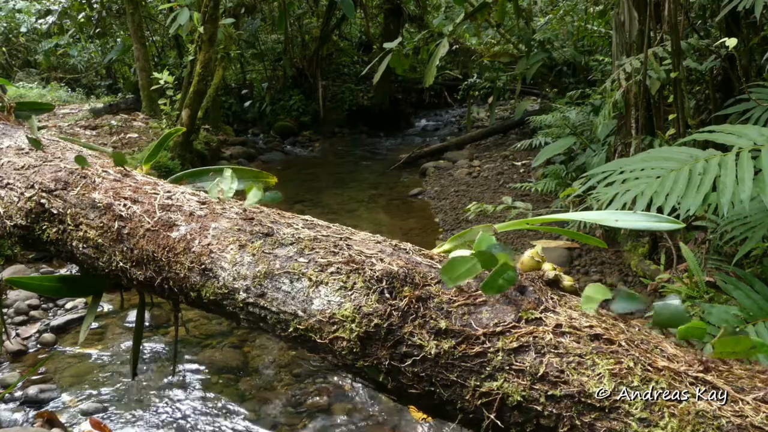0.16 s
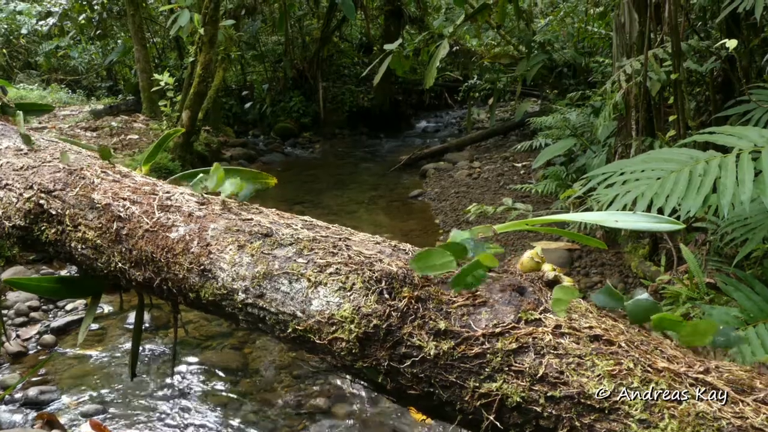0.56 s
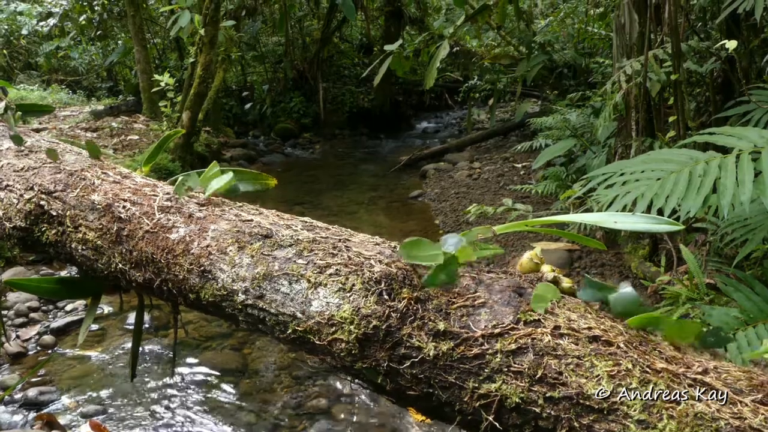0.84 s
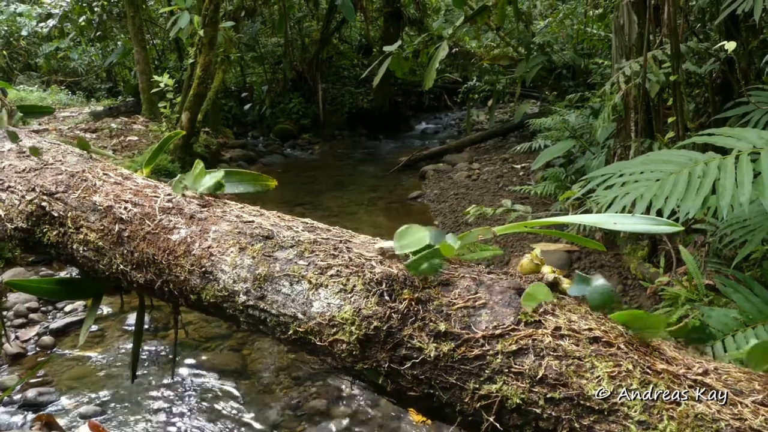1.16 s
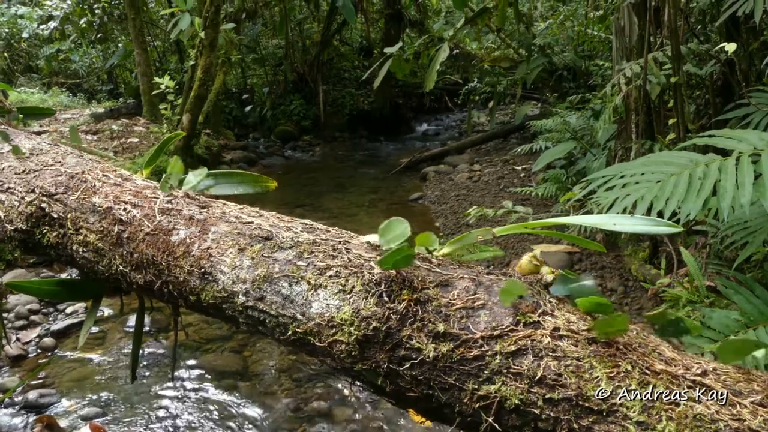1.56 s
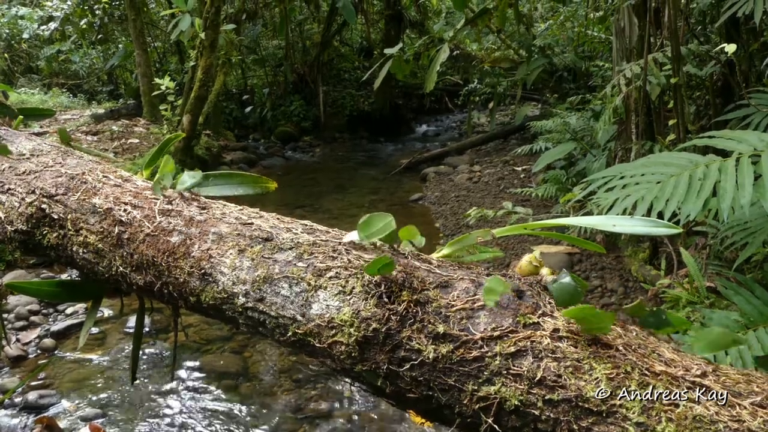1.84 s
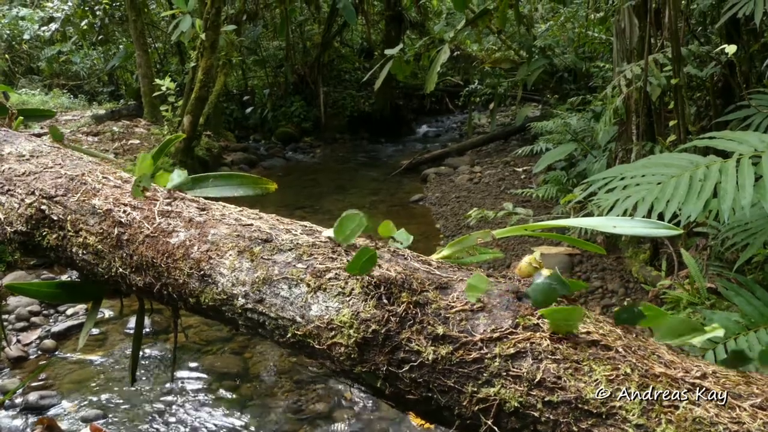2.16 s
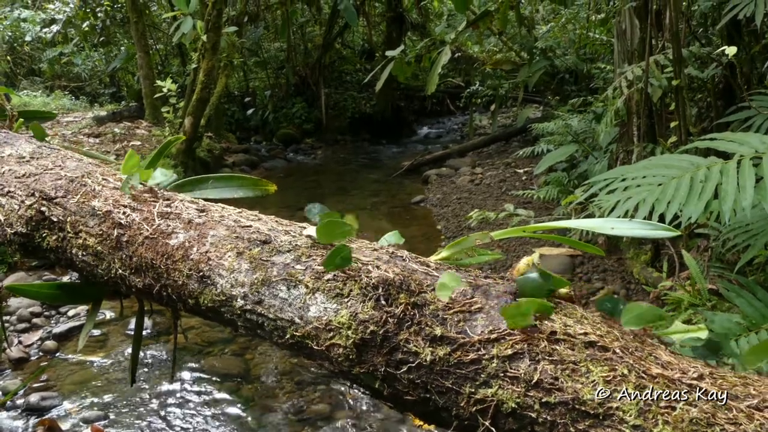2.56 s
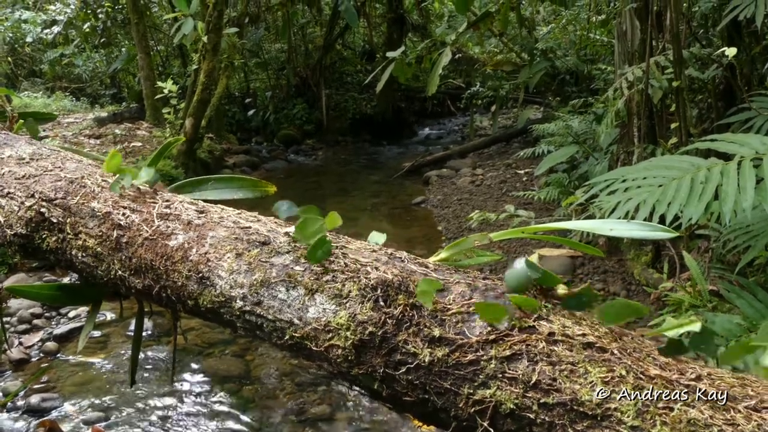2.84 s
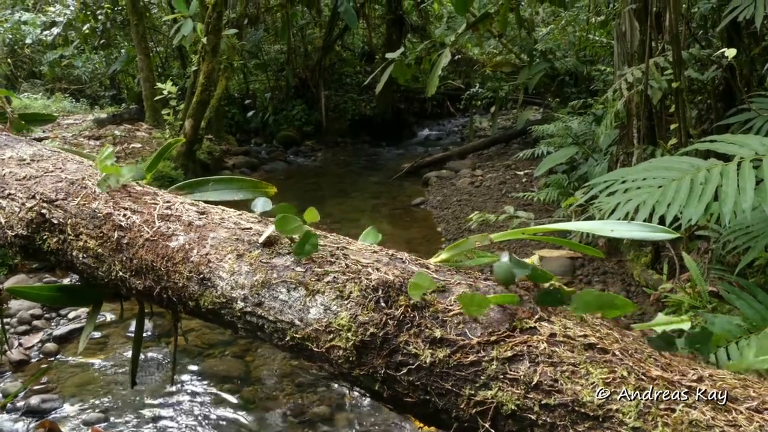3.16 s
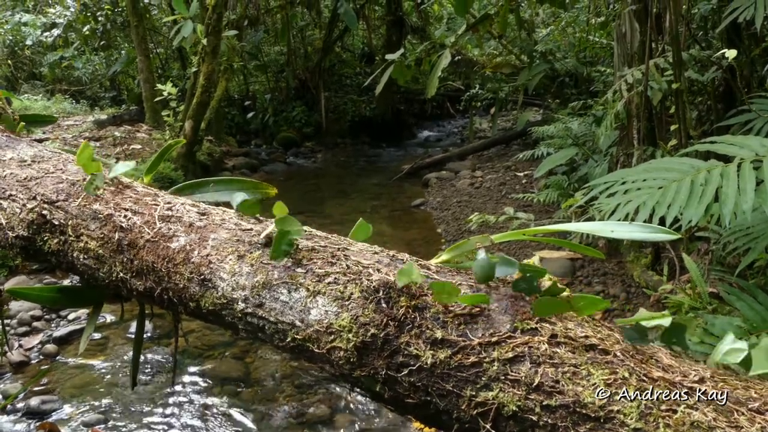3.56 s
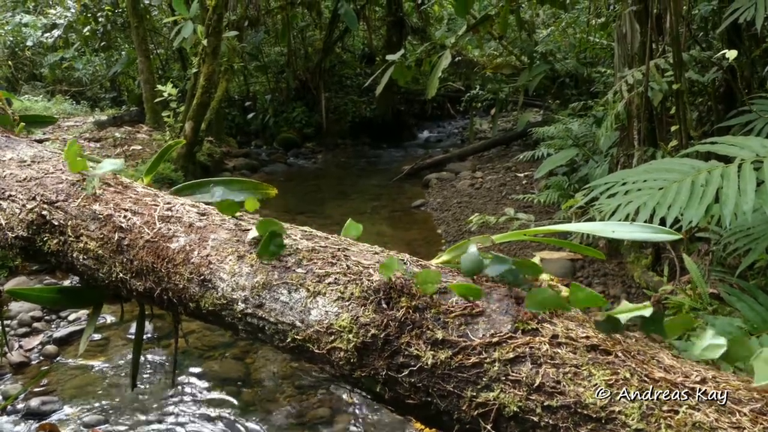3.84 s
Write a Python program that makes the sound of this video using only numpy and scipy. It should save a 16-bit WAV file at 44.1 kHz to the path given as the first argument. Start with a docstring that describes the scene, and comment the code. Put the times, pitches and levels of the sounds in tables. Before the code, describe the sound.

A shallow forest stream fades in, rushing and bubbling over stones a few metres away, with small gulps, plinks and splashes. A nearby insect chirps in high, even pulses over a thin buzz of distant insects.

```python
"""After 0.2 s of silence a shallow forest stream fades in, rushing over stones a few metres away:
a wash of water, a swarm of short-lived ringing bubbles and fine spray, with a thin, steady buzz
of far insects. From 0.4 s a nearer insect rasps its wings near 7.4 kHz, about 2.5 chirps a second.
The fade ends at 0.9 s. Larger gulps, plinks and splashes stand out from the water, thickest
around 3.1 s; stream and insects carry on to the end at 4 s."""
import sys
import numpy as np
from scipy import signal
from scipy.fft import rfft, irfft
from scipy.io import wavfile
from scipy.ndimage import uniform_filter1d

SR = 44100
rng = np.random.default_rng(int(sys.argv[2]) if len(sys.argv) > 2 else 0)


def generate_wav(signal):
    """Clip the signal to [-1, 1] and save it as 16-bit WAV at the path in sys.argv[1]."""
    frames = np.transpose(np.atleast_2d(signal))
    scaled = np.clip(frames, -1, 1) * 32767
    pcm = np.round(scaled).astype(np.int16)
    wavfile.write(sys.argv[1], SR, pcm)


N = 176400
T = np.arange(N) / SR

# Flow strength. Each row: time in seconds, gain in dB.
FLOW_CURVE = [(.2, 0.5), (.6, 0.5), (.9, -0.5), (1.25, 1), (1.56, 0.4), (1.66, 0.5), (1.85, 0.8),
              (2.3, 0.7), (2.7, 0), (2.92, 2), (3.12, 0), (3.36, 2), (3.46, -1), (3.75, 1.15), (4, -0.5)]
# Wash spectrum. Each row: frequency in Hz, relative density in dB.
WASH_SPECTRUM = [(25, -43), (60, -27.5), (150, -10), (260, -9.5), (420, -2.5), (1000, -1), (1500, -5),
                 (3000, -7), (5000, -15), (6500, -13), (8000, -16.5), (10000, -13), (13000, -18),
                 (15500, -23)]
# Wash stereo image. Each row: frequency in Hz, left-right correlation (clipped to -1..1 in use).
WASH_CORRELATION = [(60, -1.03), (110, -0.61), (170, -0.89), (270, 0.5), (450, 1), (1200, 0.84),
                    (3000, 0.67), (6000, 0.69), (9000, 0.63), (12000, 0.091), (15000, 0.18)]
# Water balance. Each row: frequency in Hz, left minus right in dB.
WATER_BALANCE = [(100, 0.5), (400, -1), (1200, 2.5), (3300, .5), (7000, 0), (10000, 0.9), (15000, 3.5)]
# Bubble size classes. Each row: pitch in Hz, bubbles per second, class level in dB.
BUBBLE_CLASSES = [(202, 20, -67.5), (303, 40, -52), (395, 60, -44.5), (672, 60, -44.5), (1014, 70, -45.5),
                  (1430, 80, -47.5), (3220, 110, -50), (5950, 130, -53.5)]
# Loud single bubbles. Each row: start in seconds, pitch in Hz, relative peak in dB.
GULP_EVENTS = [(.696, 237, -33), (.984, 860, -23), (1.134, 8030, -37), (1.301, 490, -22),
               (1.332, 2570, -31), (1.529, 575, -22), (1.55, 275, -27.5), (1.567, 382, -24.5),
               (1.732, 3340, -27), (1.802, 693, -24.5), (1.854, 1180, -21), (1.861, 2060, -26),
               (1.885, 4060, -24), (1.96, 1064, -21), (1.969, 3360, -25), (2.19, 563, -23.5),
               (2.26, 980, -20.5), (2.367, 760, -26), (2.389, 1420, -25), (2.485, 5020, -29),
               (2.53, 270, -31.5), (2.719, 3590, -29.5), (2.874, 1150, -24.5), (2.933, 1150, -25),
               (3.023, 291, -26), (3.049, 610, -18.5), (3.068, 5740, -27), (3.085, 2700, -27),
               (3.087, 2200, -24), (3.12, 696, -25), (3.134, 417, -20.5), (3.184, 456, -27.5),
               (3.242, 900, -22.5), (3.243, 3070, -26.5), (3.261, 1600, -25), (3.282, 1940, -26),
               (3.321, 453, -26), (3.462, 6100, -27.5), (3.69, 5700, -33), (3.819, 11220, -33)]
# Splashes. Each row: crest time, rise and fall in seconds, centre and width in Hz, level in dB.
SPLASH_EVENTS = [(0.89, 0.013, 0.014, 900, 190, -31.5), (1.07, 0.022, .03, 1980, 500, -33.5),
                 (1.19, .25, .25, 10600, 1900, -44.5), (2.28, .08, .08, 10000, 1800, -46),
                 (2.93, 0.066, 0.057, 970, 230, -32.5), (3.105, 0.026, 0.018, 880, 190, -29),
                 (3.464, .002, 0.06, 5400, 700, -37), (3.62, .02, .025, 10500, 1800, -44),
                 (3.82, .003, .02, 11000, 1500, -41)]
# Insect chirps. Each row: start in seconds, length in seconds, gain in dB.
CHIRP_EVENTS = [(.42, .155, -.5), (.82, .15, -1.5), (1.24, .155, 0), (1.635, .155, 0), (2.015, .15, .5),
                (2.415, .17, -.5), (2.825, .135, -1), (3.185, .16, 0), (3.568, .15, -.5), (3.955, .15, 0)]
# Fade-in. Each row: time in seconds, gain in dB.
FADE_CURVE = [(.2, -27.5), (.3, -18.5), (.41, -8), (.6, -5.5), (.9, -2)]

WASH_DB, PATCH_DB, FLICKER_DB = -31, 3, 0.56
TREBLE_FOLLOWS, TREBLE_HZ = 0.41, 1800  # hiss follows the flow less than the low end
BUBBLE_CYCLES, BUBBLE_SPREAD_DB, BUBBLE_PAN = 2.37, 2.5, 0.39
BUBBLE_HIGHPASS_HZ = 177  # bubbles, spray and splashes stay clear of the deep bass
GULP_CYCLES, GULP_REF_HZ = 3.14, 596
SPRAY_DB, SPRAY_PER_S, SPRAY_SPREAD_DB, SPRAY_DECAY_S = -48.5, 650, 7.5, 0.0006
SWARM_WET_DB, GULP_WET_DB, BANK_T60_S = -5, -9, 0.11  # the nearest bubbles are the driest
WING_HZ, WING_WAVER_HZ, WING_RASP = 7438, 13.6, 0.37
STROKES_PER_S, STROKE_DECAY_S, STROKE_FLAT_HZ, STROKE_JITTER_CYCLES = 106, 0.0058, 20, 0.053
CHIRP_DB, CHIRP_ATTACK_S, CHIRP_RELEASE_S = -37, 0.0015, 0.0099
INSECT_WET_DB, INSECT_T60_S = -19, 0.18
CHORUS_DB, CHORUS_HZ, CHORUS_WIDTH_HZ, CHORUS_PULSE_HZ = -40.5, 7215, 180, 51.7
SILENCE_S, LOWPASS_HZ = 0.2, 15600


def wash(size=1024, hop=256):
    """The blended rush of the whole stream, churning in patches."""
    frames, hz = N // hop + 5, np.fft.rfftfreq(size, 1 / SR)
    left_re, left_im, other_re, other_im, patches = rng.standard_normal((5, frames, len(hz)))
    patches = unit(uniform_filter1d(uniform_filter1d(patches, size=9, axis=0), size=9, axis=1))
    flicker = unit(uniform_filter1d(rng.standard_normal(frames), size=7))[:, None]
    follows = TREBLE_FOLLOWS + (1 - TREBLE_FOLLOWS) / (1 + (hz / TREBLE_HZ) ** 2)
    flow_db = np.interp(np.arange(frames) * hop / SR, *np.transpose(FLOW_CURVE))[:, None]
    level_db = lookup(WASH_SPECTRUM, hz) + follows * (flow_db + PATCH_DB * patches) + FLICKER_DB * flicker
    correlation = np.clip(lookup(WASH_CORRELATION, hz), -1, 1)
    left = left_re + 1j * left_im
    right = correlation * left + np.sqrt(1 - correlation ** 2) * (other_re + 1j * other_im)
    spectra = np.array([left, right]) * amp(level_db)
    _, rush = signal.istft(spectra.swapaxes(1, 2), nperseg=size, noverlap=size - hop)
    return amp(WASH_DB) * unit(rush[:, :N])


def bubble(hz, cycles, rise=0.043):
    """An air pocket rings, `cycles` per decay time, its pitch rising as it surfaces."""
    age = np.arange(0, 6, hz / cycles / SR)  # in decay times
    envelope = (1 - np.exp(-age / 0.74)) * np.exp(-age)
    return envelope * np.sin(2 * np.pi * cycles * (age + rise * age ** 2 / 2))


def gurgle(classes=40):
    """One bubble swarm per size class, swelling with the flow."""
    out = np.zeros((2, N))
    for hz in np.geomspace(BUBBLE_CLASSES[0][0], BUBBLE_CLASSES[-1][0], classes):
        ring = bubble(hz, BUBBLE_CYCLES * rng.uniform(0.57, 1.24))
        births = impulses(lookup(BUBBLE_CLASSES, hz), BUBBLE_SPREAD_DB, BUBBLE_PAN)
        swarm = signal.oaconvolve(births, ring[None], axes=1)[:, :N]
        out += amp(lookup(BUBBLE_CLASSES, hz, column=2)) * unit(swarm)
    return out * amp(np.interp(T, *np.transpose(FLOW_CURVE)))


def gulps():
    """Near single bubbles, deep gulps to plinks; smaller ones ring for more cycles."""
    out = np.zeros(N)
    for start_s, hz, db in GULP_EVENTS:
        ring = bubble(hz, GULP_CYCLES * (hz / GULP_REF_HZ) ** 0.23)
        add(out, start_s, amp(db) * ring / ring.max())
    return out


def splashes():
    """Water breaks over a stone: a bubble cloud swells and dies away."""
    out = np.zeros((2, N))
    for crest_s, rise_s, fall_s, hz, width_hz, db in SPLASH_EVENTS:
        mid, side = noise_band(hz, width_hz), 0.43 * noise_band(hz, width_hz)
        swell = np.exp(-((T - crest_s) / np.where(T < crest_s, rise_s, fall_s)) ** 2)
        out += amp(db) * swell * np.array([mid + side, mid - side])
    return out


def spray(shapes=8, size=256, band_hz=(2960, 10000)):
    """Droplets tick on the surface."""
    out = np.zeros((2, N))
    for _ in range(shapes):
        tick = rng.standard_normal(size) * np.exp(-T[:size] / SPRAY_DECAY_S)
        drops = impulses(SPRAY_PER_S / shapes, SPRAY_SPREAD_DB, pan=0.98)
        out += signal.oaconvolve(drops, tick[None], axes=1)[:, :N]
    bandpass = signal.butter(1, band_hz, "band", fs=SR, output="sos")
    return amp(SPRAY_DB) * unit(signal.sosfilt(bandpass, out))


def insect():
    """Chirps of uneven wing strokes; each stroke rings the wing, slightly flat and raspy."""
    out = np.zeros(N)
    for start_s, length_s, db in CHIRP_EVENTS:
        t = T[T < length_s + CHIRP_RELEASE_S / 2]
        turns = t * STROKES_PER_S
        stroke, age_s = turns.astype(int), turns % 1 / STROKES_PER_S
        slip, force = rng.standard_normal((2, 64))
        pitch_hz = WING_HZ + WING_WAVER_HZ * noise_band(0, width_hz=7.7)[:len(t)]
        cycles = np.cumsum(pitch_hz) / SR - STROKE_FLAT_HZ * age_s + STROKE_JITTER_CYCLES * slip[stroke]
        tone = np.sqrt(2) * np.sin(2 * np.pi * cycles)
        rasp = WING_RASP * noise_band(WING_HZ - STROKE_FLAT_HZ, width_hz=130)[:len(t)]
        pulses = (1 - np.exp(-age_s / STROKE_DECAY_S / 0.37)) * np.exp(-age_s / STROKE_DECAY_S)
        chirp = unit(pulses * amp(2 * force[stroke]) * (tone + rasp))
        edges = np.minimum(np.minimum(t / CHIRP_ATTACK_S, (t[-1] - t) / CHIRP_RELEASE_S), 1)
        add(out, start_s, amp(CHIRP_DB + db) * edges * chirp)
    return out + amp(INSECT_WET_DB) * reflections(out, INSECT_T60_S)


def chorus(depth=0.065):
    """Farther insects blur into a steady, finely pulsing buzz."""
    phase = 2 * np.pi * CHORUS_PULSE_HZ * T
    mid = noise_band(CHORUS_HZ, CHORUS_WIDTH_HZ) * (1 + depth * (np.cos(phase) + np.cos(2 * phase)))
    side = 0.17 * noise_band(CHORUS_HZ, CHORUS_WIDTH_HZ)
    return amp(CHORUS_DB) * unit(np.array([mid + side, mid - side]))


def reflections(x, t60_s, paths=4, size=12000, drift_hz=2.3, onset_s=0.0037):
    """Dense scatter from banks and plants, different for each ear, along drifting paths."""
    out = np.zeros((2, N))
    envelope = np.exp(-np.log(1000) * T[:size] / t60_s) * (1 - np.exp(-T[:size] / onset_s))
    for k in range(paths):
        tail = rng.standard_normal((2, size)) * envelope
        tail /= np.linalg.norm(tail[0])
        share = np.sqrt(2 / paths) * np.cos(2 * np.pi * drift_hz * T + np.pi * k / paths)
        out += signal.fftconvolve(np.atleast_2d(x) * share, tail, axes=1)[:, :N]
    return out


def impulses(per_s, spread_db, pan):
    """Random impulses of uneven size, spread across the stream."""
    fires = rng.random(N) < per_s / SR
    size = np.minimum(rng.exponential(1, N), 4)
    place = rng.uniform(-0.97, 1, N)
    hits = fires * amp(spread_db * size) * rng.choice([-1, 1], N)
    return hits * np.array([1 + pan * place, 1 - pan * place])


def noise_band(hz, width_hz):
    """Noise in one bell-shaped band, rms 1."""
    bell = np.exp(-((np.fft.rfftfreq(N, 1 / SR) - hz) / width_hz / 2) ** 2)
    return unit(irfft(rfft(rng.standard_normal(N)) * bell, N))


def amp(db):
    """dB to gain."""
    return 10 ** (np.asarray(db) / 20)


def unit(x):
    """Scales to rms 1."""
    return x / np.sqrt(np.mean(x ** 2) + 1e-20)


def lookup(table, hz, column=1):
    """Interpolates a table column over log frequency."""
    columns = np.transpose(table)
    return np.interp(np.log(hz + 1), np.log(columns[0] + 1), columns[column])


def add(mix, start_s, sound):
    """Mixes a sound in at start_s."""
    part = mix[round(start_s * SR):][:len(sound)]
    part += sound[:len(part)]


def scene():
    """Water slightly to the left, insects ahead."""
    swarm, near = gurgle() + spray(), gulps()
    to_banks = amp(SWARM_WET_DB) * swarm + amp(GULP_WET_DB) * near
    bubbling = swarm + near + splashes() + reflections(to_banks, BANK_T60_S)
    highpass = signal.butter(3, BUBBLE_HIGHPASS_HZ, "high", fs=SR, output="sos")
    water = wash() + signal.sosfilt(highpass, bubbling)
    lean_db = lookup(WATER_BALANCE, np.fft.rfftfreq(N, 1 / SR)) / 2
    return irfft(rfft(water) * amp([lean_db, -lean_db]), N) + insect() + chorus()


def record(dry):
    """Fade-in from silence, then low-pass."""
    fade = amp(np.interp(T, *np.transpose(FADE_CURVE))) * (T >= SILENCE_S)
    lowpass = signal.firwin(511, LOWPASS_HZ, window=("kaiser", 9), fs=SR)
    return signal.oaconvolve(dry * fade, lowpass[None], "same")


dry = scene()
out = record(dry)
generate_wav(out)
```